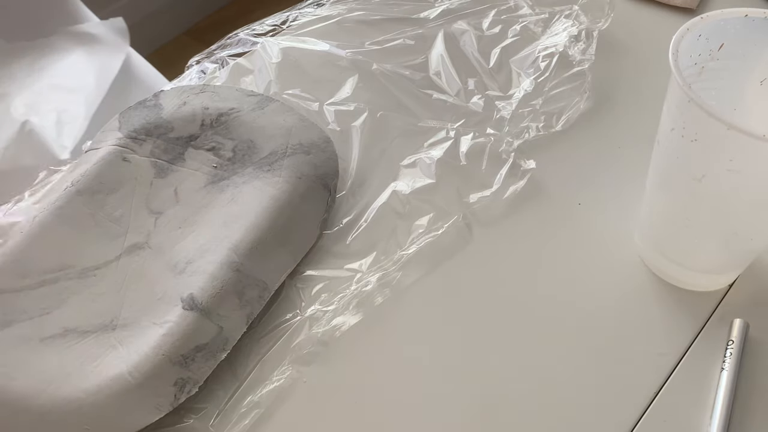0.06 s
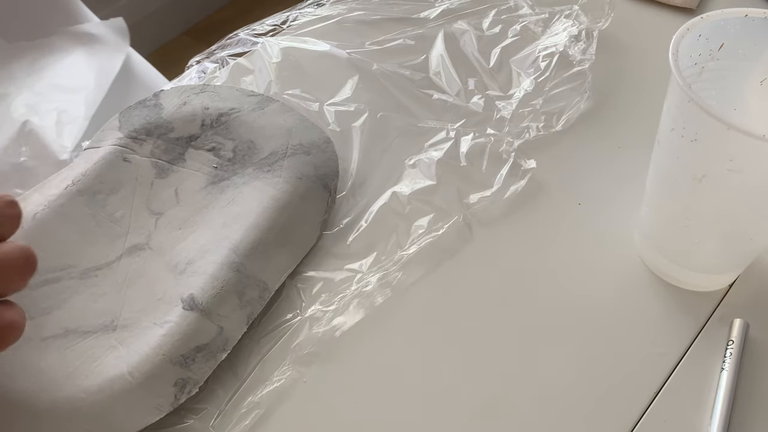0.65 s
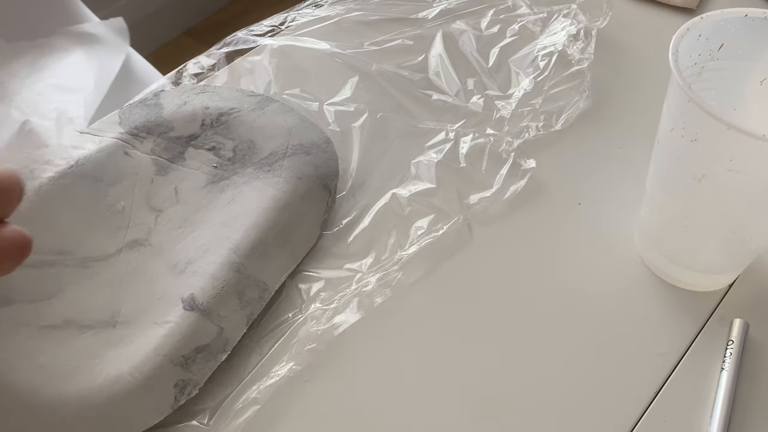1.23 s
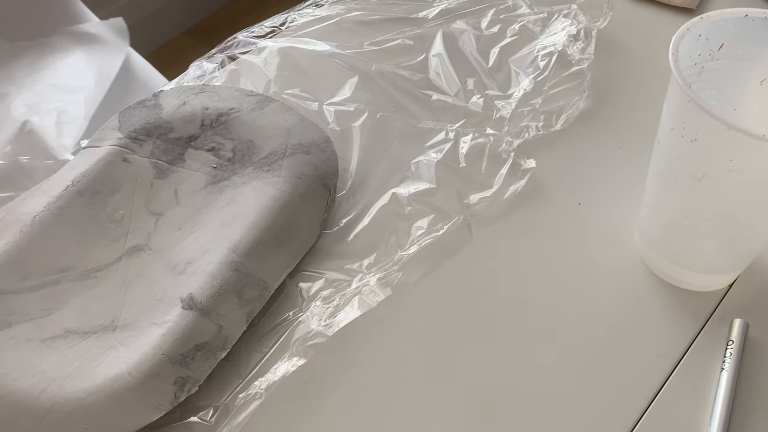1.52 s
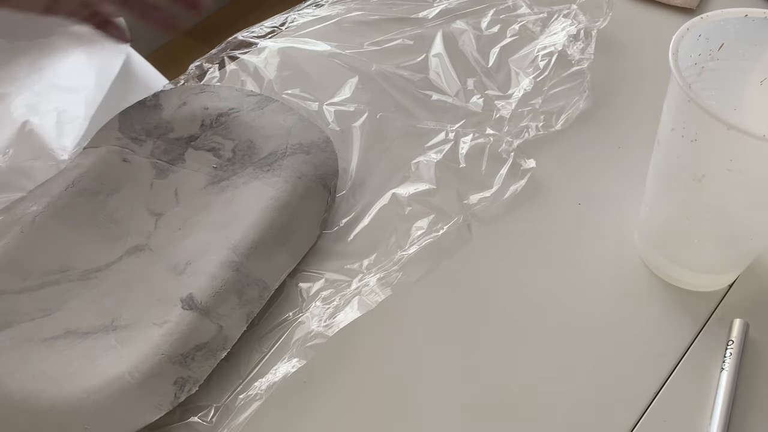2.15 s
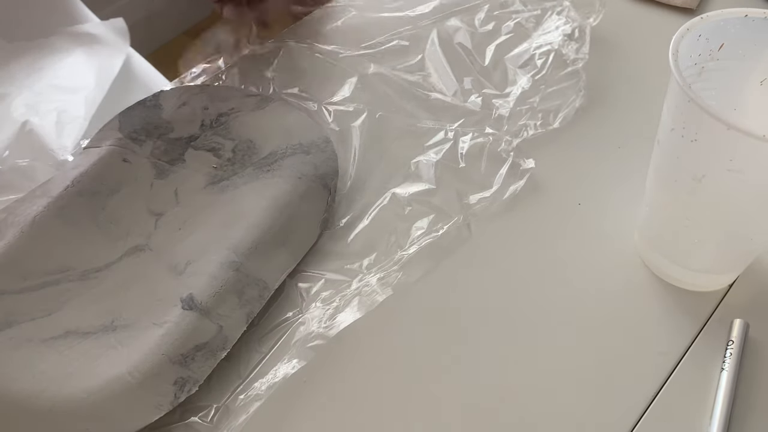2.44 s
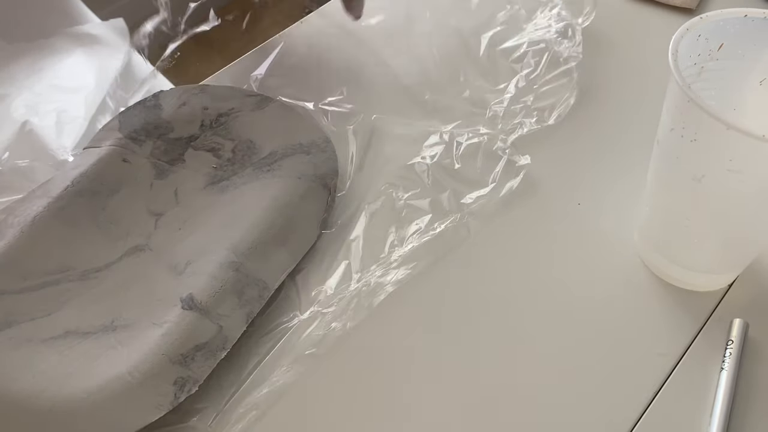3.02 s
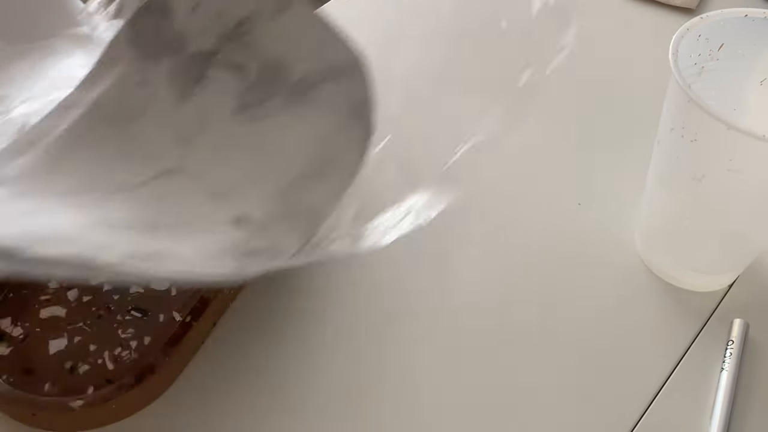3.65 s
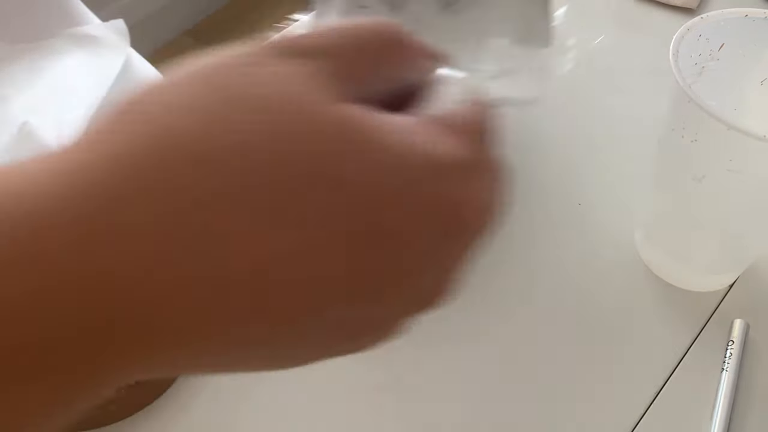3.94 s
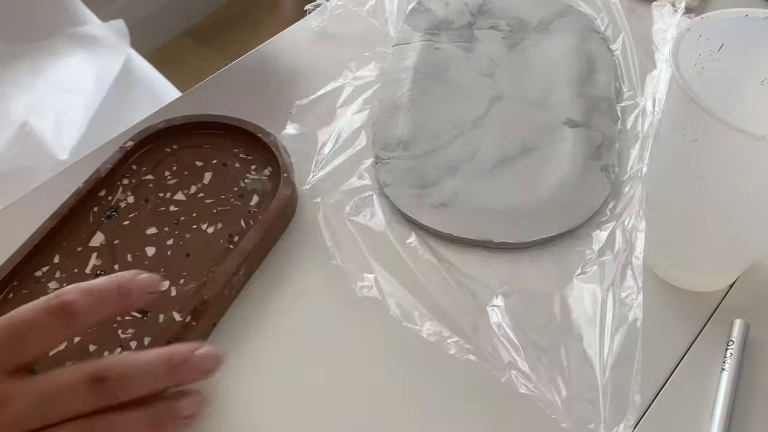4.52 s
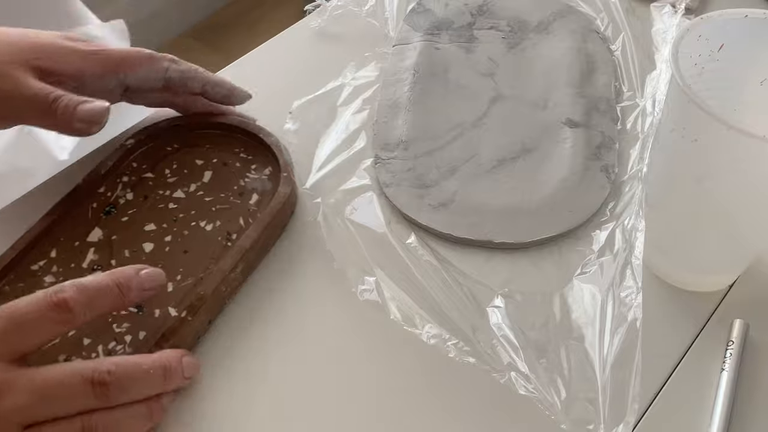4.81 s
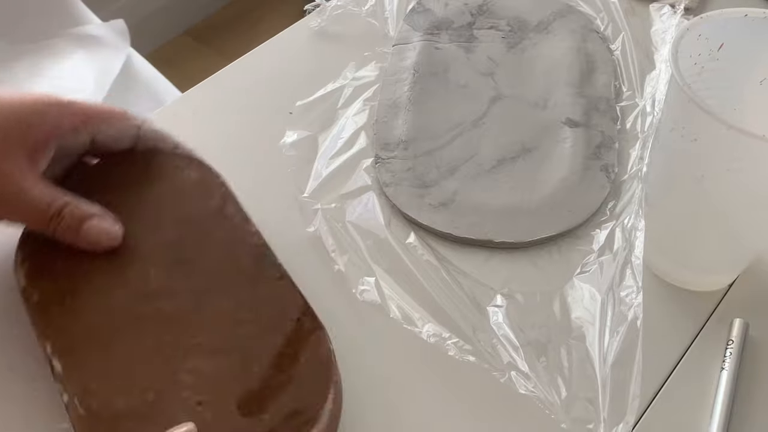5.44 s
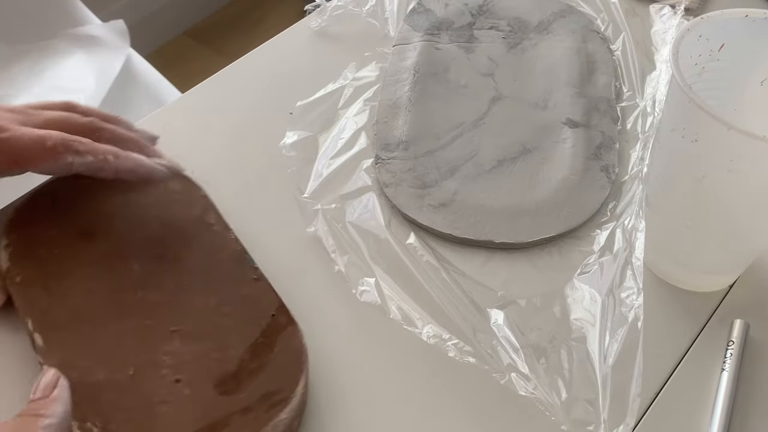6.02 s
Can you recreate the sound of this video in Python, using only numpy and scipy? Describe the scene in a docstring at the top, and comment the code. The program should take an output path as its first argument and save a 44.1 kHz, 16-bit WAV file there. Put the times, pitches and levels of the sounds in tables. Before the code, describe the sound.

A faint appliance hum fills a small, quiet room throughout. Close by, cling film rustles lightly, with scattered ticks and small snaps. A clay tray knocks on the table at about 0.6 seconds and more firmly at 1.4, ringing briefly. From about 2.3 seconds the film is pulled away, fizzing and fluttering, with sharp, bright snaps that are loudest between 3.1 and 4.1 seconds. A dull knock follows at 4.2, then a cluster of light knocks from 4.6 to 4.85 as the film settles. From about 4.9 seconds a second tray is turned over: its rim scrapes briefly, fingers rub softly on gritty clay, and tiny squeaks come near 5.3 and 5.7. The tray knocks at 5.9, drags, and drops flat just after 6 seconds with a quick ringing clatter and a very short falling hoot of squeezed air.

```python
"""An appliance hums in a quiet room. Close by, hands pull cling film off two clay trays: small creases
fizz, broad folds flutter and some creases buckle with a snap. In between, the trays knock on the table
and ring. Near five seconds the second tray is turned over: fingers rub it, its rim drags and
the clay squeaks. At about six seconds it drops flat, knocking and squeezing out a short hoot of air."""
import sys
import numpy as np
from scipy import signal
from scipy.fft import rfft, irfft
from scipy.io import wavfile
from scipy.ndimage import uniform_filter1d, map_coordinates

SR = 44100
rng = np.random.default_rng(int(sys.argv[2]) if len(sys.argv) > 2 else 0)


def to_wav(s):
    """Save 16-bit WAV."""
    ch = np.atleast_2d(s).T  # columns
    pcm = np.round(np.clip(ch, -1, 1) * 32767)  # PCM
    wavfile.write(sys.argv[1], SR, pcm.astype(np.int16))


N = 276507
TIME = np.arange(N) / SR

# The loudest creases flipping over: (time [s], level [dB], strongest pitch [Hz])
SNAPS = [(0.1244, -50, 11000), (0.2, -46, 3300), (0.35, -49, 8000), (0.38, -40, 4500), (0.392, -45, 7000),
         (0.542, -46, 7000), (0.552, -39, 9100), (0.5715, -44, 8000), (0.742, -46.5, 4000),
         (0.992, -51, 9000), (1.3744, -38, 10000), (1.895, -49.5, 5960), (2.2784, -46.5, 8000),
         (2.314, -50, 10000), (2.412, -48, 9000), (2.532, -50, 11000), (2.569, -52, 7000),
         (2.701, -52, 8000), (2.782, -40, 11000), (2.812, -34, 7000), (2.867, -38, 11000),
         (2.893, -35.5, 10000), (2.9665, -49, 10000), (3.055, -43, 9000), (3.066, -38, 3480),
         (3.1412, -25.5, 5080), (3.155, -33, 2300), (3.1749, -28, 5500), (3.242, -42, 9000),
         (3.338, -29.5, 4970), (3.363, -26, 11000), (3.3694, -18, 9700), (3.398, -32.5, 3620),
         (3.424, -34.5, 7040), (3.474, -40, 10000), (3.542, -41.5, 10200), (3.627, -47, 12100),
         (3.694, -24, 5530), (3.743, -35.5, 3800), (3.91, -37.5, 5000), (3.925, -34, 10200),
         (3.997, -18, 9400), (4.0214, -28.5, 5000), (4.0665, -29, 9000), (4.082, -25, 10000),
         (4.0905, -15, 7140)]
MIDDLE_HZ = 8000  # brighter snaps stir mostly small creases, duller ones broad folds
FILM_LAG_MS, FOLD_LAG_MS = -0.183, 0.041  # the film lies to the right; folds bend a little to the left


def amp(db):
    """Turns decibels into a gain to multiply by."""
    return 10 ** (np.asarray(db) / 20)


def evened(x):
    """Scales x to an average power of 1."""
    return x / np.sqrt(np.mean(x ** 2) + 1e-20)


def read(points, hz):
    """Looks up a table's value at any pitch, spacing the octaves evenly."""
    f, value = np.transpose(points)
    return np.interp(np.log(hz + 1), np.log(f + 1), value)


def bump(hz, centre_hz, octaves):
    """A hill of height 1 around one pitch."""
    return np.exp(-(np.log2((hz + 1) / centre_hz) / octaves) ** 2)


def add(mix, s, sound):
    """Mixes a sound in at s seconds."""
    part = mix[:, max(round(s * SR), 0):][:, :sound.shape[-1]]
    part += sound[..., :part.shape[-1]]


def panned(db):
    """Left and right gains, with the left louder by db."""
    return amp([[db / 2], [-db / 2]])


def ears(lag_ms, size=128):
    """A click as two ears hear it, the right one lag_ms later."""
    lag = lag_ms * SR / 1000
    return np.sinc(np.arange(size) - np.maximum([[-lag], [lag]], 0))


def alike(z):
    """Makes left and right spectra partly agree, most in the bass, as at two nearby points."""
    # How alike the sides are: (pitch [Hz], likeness [0 to 1])
    likeness = [(60, 0.3), (150, 0.91), (300, 0.21), (700, 0.012), (2000, 0.25), (10000, 0.047)]
    same = np.clip(read(likeness, np.linspace(0, SR / 2, z.shape[1])), -1, 1)
    return np.array([z[0], same * z[0] + np.sqrt(1 - same ** 2) * z[1]])


def convolve(x, response):
    """Filters x: every sample sets off a copy of the response."""
    return signal.fftconvolve(np.atleast_2d(x), np.atleast_2d(response), axes=1)[:, :N]


def pulse(db_at, size=4096):
    """The shortest click that has the given level at each pitch."""
    hz = abs(np.fft.fftfreq(size, 1 / SR))
    log_gain = np.log(amp(np.maximum(db_at(hz), -100)))
    return np.fft.ifft(np.exp(np.conj(signal.hilbert(log_gain)))).real[:size // 2]


def coloured(x, spectrum):
    """Changes the tone of x while keeping its clicks sharp."""
    return convolve(x, pulse(lambda hz: read(spectrum, hz)))


def resonant(x, modes):
    """Passes x through resonances, the pitches at which an object likes to ring."""
    def power(hz):
        return sum(amp(db) ** 2 / (1 + (2 * (hz - f) / width) ** 2) ** 1.22 for f, width, db in modes)
    return evened(convolve(x, pulse(lambda hz: 10 * np.log10(power(hz)))))


def dispersed(x, lag_s):
    """Low notes travel more slowly through a bending sheet; lag_s is the delay at 1 kHz."""
    hz = np.fft.rfftfreq(2 * len(x), 1 / SR)
    delay = np.exp(-4j * np.pi * lag_s * np.sqrt(1000 * hz))
    return irfft(rfft(x, 2 * len(x)) * delay)[:len(x)]


def wander(rate_hz):
    """A smooth random wobble, about 1 in size."""
    hz = np.fft.rfftfreq(N, 1 / SR)
    return evened(irfft(rfft(rng.standard_normal(N)) * np.exp(-(hz / rate_hz) ** 2), N))


def patchy(x, depth_db, patch_hz=900, patch_s=.018):
    """The tone shifts from moment to moment as different spots are set ringing."""
    z = signal.stft(x, nperseg=256)[2]
    patches = rng.standard_normal(z.shape[1:])
    for axis, span in enumerate([patch_hz * 256 / SR, patch_s * SR / 128]):
        patches = uniform_filter1d(patches, max(round(span), 1), axis)
    return evened(signal.istft(z * amp(depth_db * evened(patches)), nperseg=256)[1][:, :N])


def scatter(t60_at, seconds, rise_s):
    """A cloud of echoes; t60_at gives the seconds each pitch takes to fade by 60 dB."""
    size = int(seconds * SR)
    hz, t, z = signal.stft(rng.choice([-1., 1.], (2, size)), SR, nperseg=128)
    tail = signal.istft(z * amp(-60 * t / t60_at(hz)[:, None]), SR, nperseg=128)[1][:, :size]
    z = alike(rfft(tail * (1 - np.exp(-np.arange(size) / SR / rise_s))))
    z /= np.sqrt(uniform_filter1d(abs(z) ** 2, size=int(seconds * 200), axis=1))  # evens out the tone
    return irfft(z, size) * np.minimum(1, np.linspace(4, 0, size)) ** 4


def room(x):
    """The echoes of x from the walls of a small room."""
    # How long the room rings: (pitch [Hz], time to fade by 60 dB [s])
    fade_times = [(100, 0.72), (300, 0.45), (1000, 0.47), (3000, 0.48), (7000, 0.56), (15000, 0.092)]
    return convolve(x, scatter(lambda hz: read(fade_times, hz), seconds=.6, rise_s=0.00011))


def grains(per_s, spread_db, clump_db, lag_ms, stray_share=.35, max_shift=12):
    """Tiny uneven clicks in clumps; most come from one side, the rest from all around."""
    size = amp(spread_db * np.minimum(rng.exponential(1, N), 3.5) + clump_db * wander(49))
    clicks = size * rng.choice([-1, 1], N) * (rng.random(N) < per_s / SR)
    shift = rng.integers(-max_shift, max_shift, N) * (rng.random(N) < stray_share)
    right = sum(np.roll(clicks * (shift == k), k) for k in range(-max_shift, max_shift))
    return evened(convolve([clicks, right], ears(lag_ms)))


def gesture(start, length, db, swell_db, attack_s=0.017, release_s=0.052):
    """Strength of one hand movement: it sets in, swells or slackens, then dies away."""
    t = np.maximum(TIME - start, 0)
    held = amp(db + swell_db * (np.minimum(t / length, 1) - .5))
    return held * np.minimum(t / attack_s, 1) * np.exp(-np.maximum(t - length, 0) / release_s)


def together(strengths):
    """The joint strength of unrelated noises: their squares add up."""
    return np.sqrt(sum(strength ** 2 for strength in strengths))


def humming_room(air_db=-54, waver_hz=0.67, flutter=0.033):
    """An appliance hums with wavering tones over the soft rush of the room."""
    # The appliance's tones: (pitch [Hz], level [dB])
    tones = [(58.7, -59.5), (110.7, -52), (140, -64), (220.7, -68.5), (283, -71), (443, -73.5),
             (739, -71.5), (886, -70.5), (996, -73.5)]
    # The tone of the rush: (pitch [Hz], level [dB])
    air_tone = [(20, -76), (48, -1.5), (81, -12), (100, -11.5), (172, -15.5), (270, -13), (380, -25),
                (440, -19.5), (500, -24.5), (900, -24.5), (1480, -29.5), (2500, -38.5), (4200, -47),
                (5800, -51), (8000, -55.5), (16000, -66)]
    noise = alike(rfft(rng.standard_normal((2, N))))
    air = irfft(noise * amp(read(air_tone, np.fft.rfftfreq(N, 1 / SR))), N)
    hum = np.zeros(N)
    for hz, db in tones:
        strength = amp(db) * (1 + flutter * wander(12.0)) * np.sqrt(2)
        hum += strength * np.sin(2 * np.pi * np.cumsum(hz + waver_hz * wander(6.04)) / SR)
    return amp(air_db) * evened(air) + hum * panned(-2.7)


def film_rustle(fizz_db=1.5, ticks_db=-3, stray_db=5):
    """Small creases fizz, larger ones tick and broad folds flutter, during pulls and after snaps."""
    # Hands pulling or pressing the film: (start [s], length [s], fizz [dB], folds [dB], swell [dB])
    pulls = [(0.042, 0.074, -68.5, -82, 8), (0.172, 0.3, -75, -69, -7), (0.507, 0.045, -67, -64, 12),
             (0.707, 0.18, -74, -74, -2.5), (1.186, 0.16, -73.5, -70.5, 17), (2.298, 0.15, -67, -67, -1.5),
             (2.542, 0.038, -67.5, -65, -11), (2.762, 0.41, -63, -64.5, 3.5),
             (2.873, 0.043, -51.5, -61, -11), (3.135, 0.02, -54, -64, -13), (3.207, 0.13, -67, -65, 10),
             (3.355, 0.02, -50, -49, -3), (3.545, 0.62, -73, -71.5, 10), (3.712, 0.069, -70, -63.5, -4),
             (4.064, 0.085, -49.5, -47.5, 2), (4.23, 0.19, -72.5, -69, -0.5), (4.57, 0.15, -73, -70.5, 8)]
    # The tone of the creases: (pitch [Hz], level [dB])
    fizz_tone = [(1500, -14), (4000, -23), (7000, -9.5), (9500, 0), (12300, -2), (13700, -11), (15300, -4)]
    # The tone of the folds: (pitch [Hz], level [dB])
    fold_tone = [(200, -6), (700, -8), (1500, -8), (2800, -4.5), (4500, -10), (7000, -7.5), (12000, -26.5)]
    fizz = together(gesture(s, length, db, swell) for s, length, db, _, swell in pulls)
    fizz = together([fizz, aftershocks(lean=0.42)])
    folds = together(gesture(s, length, db, swell) for s, length, _, db, swell in pulls)
    folds = together([folds, aftershocks(lean=-1.28)])
    small = grains(per_s=3200, spread_db=4.0, clump_db=2.2, lag_ms=FILM_LAG_MS)
    small = patchy(coloured(small, fizz_tone), depth_db=1.8)
    broad = grains(per_s=1600, spread_db=3.4, clump_db=1.6, lag_ms=FOLD_LAG_MS)
    broad = patchy(coloured(broad, fold_tone), depth_db=2.0)
    ticks = coloured(grains(per_s=70, spread_db=2.5, clump_db=1, lag_ms=FILM_LAG_MS), fizz_tone)
    creases = amp(fizz_db) * small + amp(ticks_db) * ticks
    return fizz * creases + folds * broad + amp(stray_db) * stray_creases(fizz, folds)


def stray_creases(fizz, folds, count=1100, low_hz=2000, high_hz=12450, cycles=2.7, width_db=5):
    """Single creases tick at random: high ones with the fizz, low ones with the folds."""
    out, t = np.zeros((2, N)), np.arange(SR // 60) / SR
    for when, pitch, chance, side, turn in rng.random((count, 5)):
        hz, at = low_hz * (high_hz / low_hz) ** pitch, int(when * N)
        strength = pitch * fizz[at] + (1 - pitch) * folds[at]
        size = strength * amp(2 * min(-np.log(chance), 3)) * np.sqrt(hz / MIDDLE_HZ)
        ring = np.exp(-t * hz / cycles) * np.sin(2 * np.pi * (hz * t + np.array([[0], [turn - .5]]) / 2))
        add(out, at / SR, size * panned(width_db * (2 * side - 1)) * ring)
    return out


def film_snaps(gain_db=8.5, shiver_db=-3, width_octaves=1.65, humps_db=2.0, dull_hz=5100):
    """A crease buckles in an instant and the sheet around it shivers."""
    out = np.zeros((2, N))
    for s, db, bright_hz in SNAPS:
        size = rng.random()  # each size of crease favours its own pitches, an octave apart
        click = pulse(lambda hz: -12 * np.log(1 + (np.log2((hz + 1) / bright_hz) / width_octaves) ** 2)
                      + humps_db * np.sin(2 * np.pi * (np.log2(hz + 1) + size)))
        shiver = scatter(lambda hz: np.full(hz.shape, 100 / bright_hz), seconds=.04, rise_s=.0001)
        shiver *= amp(shiver_db)
        add(shiver, 0, ears(FOLD_LAG_MS if bright_hz < dull_hz else FILM_LAG_MS))  # folds snap dully
        snap = convolve(shiver, dispersed(click, lag_s=0.000782))
        add(out, s, amp(gain_db + db) * panned(2) * snap)
    return out


def aftershocks(lean, gain_db=-30, fade_s=0.019):
    """How strongly snaps stir nearby creases; lean above 0 favours bright snaps, below 0 dull ones."""
    power = np.zeros(N)
    for s, db, hz in SNAPS:
        power[round(s * SR)] += (amp(db + gain_db) * (hz / MIDDLE_HZ) ** lean) ** 2
    return np.sqrt(signal.lfilter([1], [1, -np.exp(-2 / (fade_s * SR))], power + 1e-20))


def tray_knocks(gain_db=8, ring_db=-45, room_db=-6, sway_db=-49, sway_hz=56, second_tray_s=4.5):
    """Each knock is a short push that rings the tray, thuds through the table's board and sways it."""
    # Trays meeting the table: (time [s], level [dB], hardness [Hz], low cut [Hz], favoured pitch [Hz],
    # its lift [dB], left over right [dB], freedom to ring [dB], right ear's delay [ms])
    contacts = [(0.5845, -11, 1270, 150, 514, 5.5, 1, 0, 0.2),
                (1.374, -2.5, 1520, 253, 440, 5.5, 1, 1.5, 0.18),
                (3.694, -23, 3500, 815, 1010, 12.5, 8.5, -28, -0.0095),
                (4.2126, -15, 1850, 69, 209, 5.5, 0, -7, 0.016),
                (4.635, -13.5, 1760, 160, 264, 9.5, 6, -1, 0.12),
                (4.644, -14, 780, 170, 605, 4.5, -8, 6, -0.25),
                (4.7258, -19.5, 1270, 200, 1630, 3.5, 9, -1, 0.15),
                (4.731, -15, 880, 200, 440, 8.5, -3, -0.5, 0.11),
                (4.828, -9.5, 2500, 134, 505, 10, 1.5, 0, 0.16),
                (4.8392, -12.5, 2500, 130, 540, 9.5, 6, 2.5, 0.11),
                (4.847, -13.5, 2170, 130, 239, 12.5, 3, 0.5, 0.087),
                (5.87, -1.5, 2260, 222, 520, -2.5, 9, -0.5, 0.082),
                (5.8864, -8, 1930, 202, 520, 4, 4, -1, 0.12),
                (5.8938, -10, 1300, 260, 1180, 12, 7, -4.5, 0.21),
                (6.0452, -1.5, 2730, 220, 815, 8, 6, -2.5, 0.261),
                (6.0693, -1.5, 3700, 254, 3770, 4.5, 6.5, -5.5, -0.61),
                (6.073, -6.5, 1860, 290, 1100, 10, 10, -6.5, 0.24)]
    # The first tray's ringing tones: (pitch [Hz], level [dB], time to fade by 60 dB [s])
    first_modes = [(200, 1, 0.18), (347, 2, 0.21), (450, 2, .14), (532.5, 6.5, 0.11), (566, -13, 0.22),
                   (657, 5, 0.16), (759, 10, 0.095), (1147, 16.5, 0.077), (1230, -1, .25),
                   (1560, 16, 0.044), (1704, 10, 0.12), (1776, 7, 0.14), (1893, 3.5, 0.2),
                   (2580, 14, 0.027), (3020, 10, 0.03)]
    # The second tray's ringing tones: (pitch [Hz], level [dB], time to fade by 60 dB [s])
    second_modes = [(242.4, -2, 0.23), (288.6, -2, 0.34), (346, 3.5, 0.094), (438, -5, 0.43), (492, 3, .13),
                    (551.7, 7.5, 0.14), (652, -4, 0.29), (743, 10.5, .11), (835, 7, .11), (931, 1, 0.12),
                    (1060, -1, .16), (1150, 7, .15), (1235, -0.5, 0.22), (1576, 19.5, 0.046),
                    (2434, 18.5, 0.027), (2610, 17.5, 0.025), (3140, 12, 0.019), (3800, 14.5, 0.02),
                    (4720, 13, 0.025), (5700, 13, .028)]
    # The table's dense, quickly fading thud: (pitch [Hz], level [dB])
    thud_tone = [(40, 16), (150, 14.5), (350, 5.5), (700, 6), (1100, 3), (1350, 4), (1650, 6), (2100, -1.5),
                 (2750, 3.5), (4200, -5), (7000, -6.5), (10000, -10), (16000, -11)]
    out, t = np.zeros((2, N)), np.arange(SR // 2) / SR
    for s, db, hard_hz, low_hz, favoured_hz, lift_db, pan_db, free_db, lag_ms in contacts:
        def push_db(hz):
            band = -10 * np.log10((1 + (hz / hard_hz) ** 4) * (1 + (low_hz / (hz + 1)) ** 4))
            # a spot that favours one pitch moves less about an octave higher
            return band + lift_db * (bump(hz, favoured_hz, 0.41)
                                     - 0.34 * bump(hz, 2.18 * favoured_hz, 0.41))
        ring = tray_ring(first_modes if s < second_tray_s else second_modes, t)
        held_db = 0.14 * min(free_db, 0)  # a damped knock also sends less into the board and the room
        board = scatter(lambda hz: 0.04 * (1 + hz / 2000) ** -.5, seconds=.15, rise_s=0.0014)
        board *= amp(held_db - 2) * panned(pan_db / 2)
        add(board, 0, amp(-2) * panned(pan_db) * ears(lag_ms))  # the first, direct click
        body = amp(ring_db + free_db) * ring * panned(pan_db / 2)
        add(body, 0, coloured(board, thud_tone))
        knock = amp(gain_db + db) * convolve(body, dispersed(pulse(push_db), lag_s=0.001108))
        add(out, s, knock)
        add(out, s, amp(room_db + held_db) * room(knock * panned(-pan_db / 2)))
        add(out, s, amp(gain_db + db + sway_db - 60 * t) * np.sin(2 * np.pi * sway_hz * t))
    return out


def tray_ring(modes, t, detune=0.0091, spot_db=1.7):
    """The tray's fading tones; the spot struck and the grip change their strength and pitch."""
    out = np.zeros((2, len(t)))
    for (hz, db, t60), (spot, grip, skew) in zip(modes, rng.standard_normal((len(modes), 3))):
        khz = hz / 1000
        pitch = hz * (1 + detune * grip * min(khz / 2, 1) ** 2)
        apart = np.sqrt(khz) * skew * np.array([[1], [-2]])  # high tones reach the ears less in step
        out += amp(db + spot_db * spot - 60 * t / t60) * np.cos(2 * np.pi * pitch * t + apart)
    return out


def finger_rub(hold_s=4.85, hold_length_s=0.87, hold_db=-67.5, lift_db=6, grip_drift=.012):
    """Skin on gritty clay makes the tray ring: a steady rub from holding it, plus short strokes."""
    # The tray's resonances: (pitch [Hz], width [Hz], level [dB])
    tray_modes = [(1050, 92, -6), (2560, 98, 2), (4680, 410, 0.5), (5900, 250, -9), (7160, 340, -1),
                  (10260, 1140, -3.5), (15700, 1900, -17)]
    # Fingers sliding as the tray turns: (middle [s], length [s], level [dB], favoured pitch [Hz])
    strokes = [(4.933, 0.053, -66, 5900), (5.026, 0.047, -58, 9900), (5.178, 0.066, -65.5, 5940),
               (5.322, 0.058, -56.5, 2560), (5.577, 0.065, -64, 4700), (5.763, 0.046, -54.5, 7300)]
    grit = grains(per_s=23000, spread_db=2.0, clump_db=1.5, lag_ms=0.057)
    skin = patchy(resonant(grit, tray_modes), depth_db=1.5)
    place = np.arange(N) + np.cumsum(grip_drift * wander(14))  # the shifting grip retunes the tray
    skin = np.array([map_coordinates(side, [place], order=3, mode="wrap") for side in skin])
    fingers = gesture(hold_s, hold_length_s, hold_db, swell_db=5, attack_s=.03, release_s=0.033) * skin
    for s, length, db, favoured_hz in strokes:
        near = abs(TIME - s) < 2 * length
        touch = pulse(lambda hz: lift_db * bump(hz, favoured_hz, octaves=0.083))
        stroke = evened(convolve(skin[:, near], touch)[:, :near.sum()])
        swell = np.exp(-2 * abs((TIME[near] - s) / length) ** 3)
        add(fingers, TIME[near][0], amp(db) * swell * stroke)
    pressure = amp(0.5 * wander(13.0))  # fingers never press evenly
    return pressure * fingers


def rim_drag():
    """The tray's rim scrapes over the table in tiny bumps that shake the board."""
    # The board's resonances: (pitch [Hz], width [Hz], level [dB])
    board_modes = [(520, 770, -7), (780, 120, -4), (1154, 29, -4.5), (1580, 490, -7), (2500, 690, -9),
                   (3600, 660, -10)]
    # Slides of the rim: (start [s], length [s], level [dB], swell [dB])
    drags = [(4.91, 0.076, -55, 13), (5.926, 0.15, -52, 20), (6.123, 0.145, -75, 15)]
    rim = resonant(grains(per_s=2100, spread_db=2.5, clump_db=-3.0, lag_ms=0.11), board_modes)
    return together(gesture(*drag) for drag in drags) * rim * panned(6.4)


def clay_squeaks(jitter=0.022):
    """The tray sticks and slips, twice under the fingers and once just before it drops flat."""
    # Squeaks of the clay: (start [s], length [s], pitch [Hz], level [dB])
    slips = [(5.298, 0.058, 1050, -54), (5.737, 0.07, 4780, -54), (6.005, 0.029, 1168, -40.5)]
    out = np.zeros(N)
    for s, length, hz, db in slips:
        swell = np.sin(np.pi * np.clip((TIME - s) / length, 0, 1))
        pitch = hz * (1 + jitter * wander(206))
        out += amp(db) * swell * np.sin(2 * np.pi * np.cumsum(pitch) / SR)
    return out * panned(6.8)


def air_pocket(start_s=6.0456, length_s=0.023, first_hz=1110, last_hz=700, gain_db=-15.5):
    """Air squeezed from under the falling tray hoots lower as the gap closes."""
    out, progress = np.zeros((2, N)), np.linspace(0, 1, int(length_s * SR))
    turns = np.cumsum(first_hz + (last_hz - first_hz) * progress) / SR
    swell = np.minimum(20 * progress, 1) * (1 - progress) ** 1.2
    add(out, start_s, amp(gain_db) * swell * np.sin(2 * np.pi * turns))
    return panned(6) * convolve(out, ears(lag_ms=0.26))


def scene(handling_echo_db=-11, snap_echo_db=-13):
    """Mixes the film, the trays, their echoes and the hum."""
    handling = film_rustle() + finger_rub() + rim_drag() + clay_squeaks() + air_pocket()
    snaps = film_snaps()
    knocks = tray_knocks()
    echoes = room(amp(handling_echo_db) * handling + amp(snap_echo_db) * snaps)
    return humming_room() + handling + snaps + knocks + echoes


def record(dry, edge_hz=16000):
    """Cuts away the very highest treble."""
    low_pass = signal.firwin(255, edge_hz, window=("kaiser", 9), fs=SR)
    return signal.oaconvolve(dry, low_pass[None], "same")


dry = scene()
out = record(dry)
to_wav(out)
```